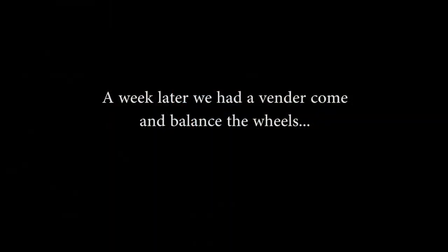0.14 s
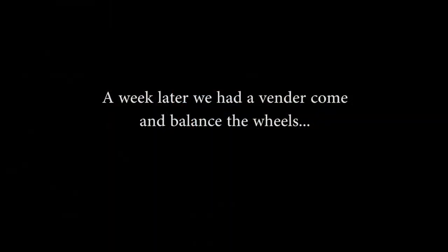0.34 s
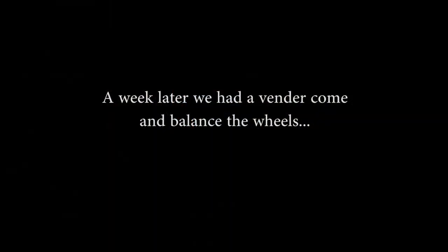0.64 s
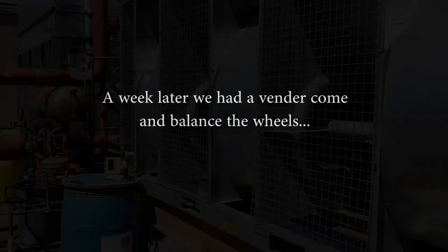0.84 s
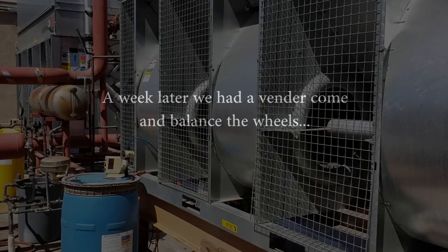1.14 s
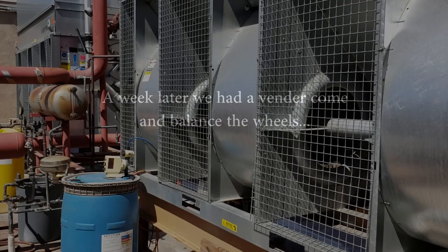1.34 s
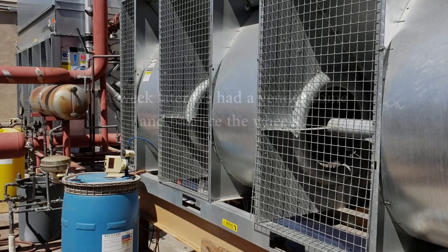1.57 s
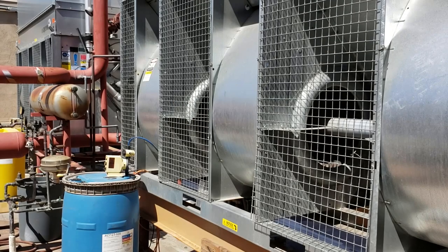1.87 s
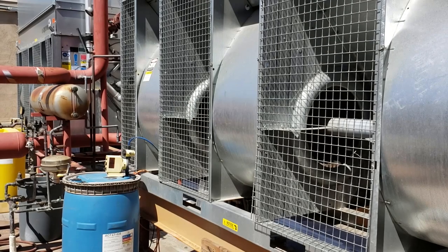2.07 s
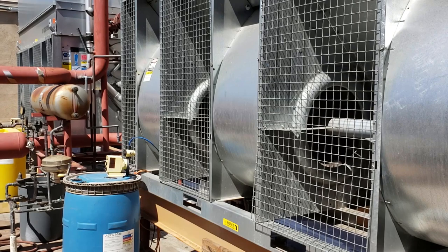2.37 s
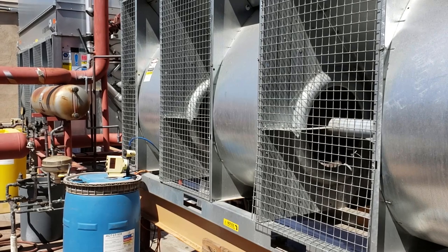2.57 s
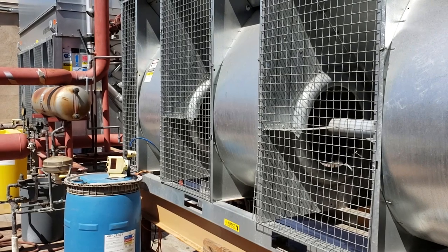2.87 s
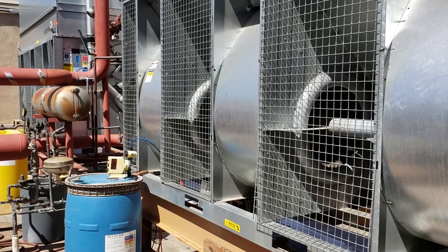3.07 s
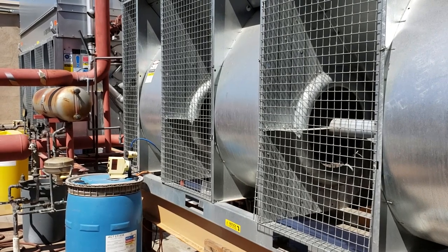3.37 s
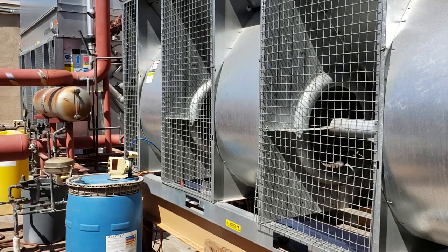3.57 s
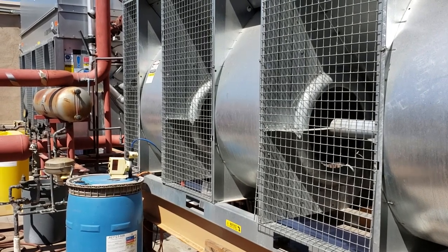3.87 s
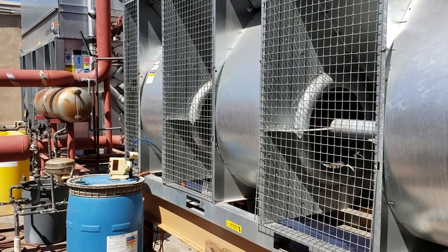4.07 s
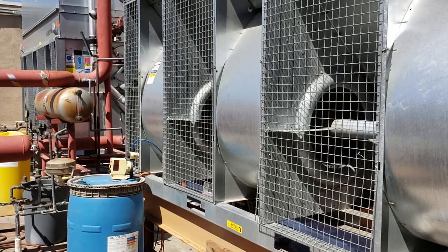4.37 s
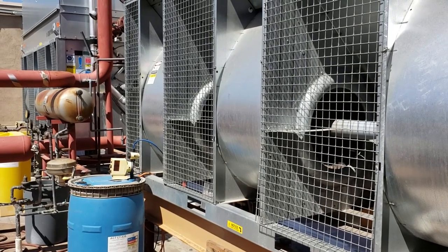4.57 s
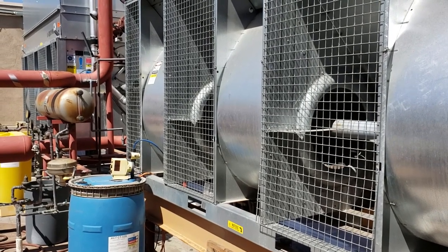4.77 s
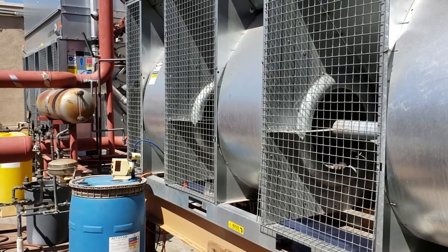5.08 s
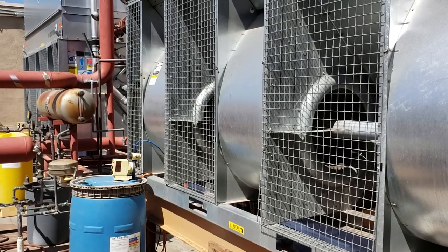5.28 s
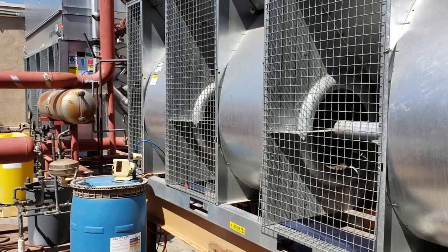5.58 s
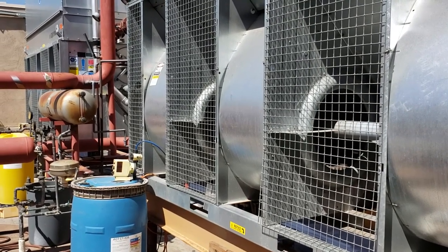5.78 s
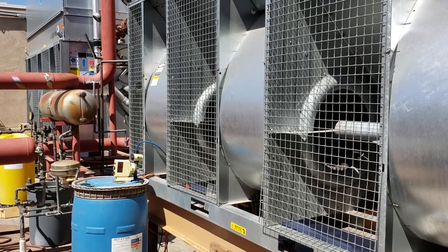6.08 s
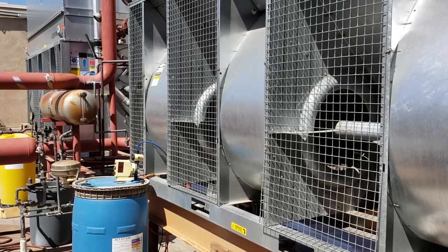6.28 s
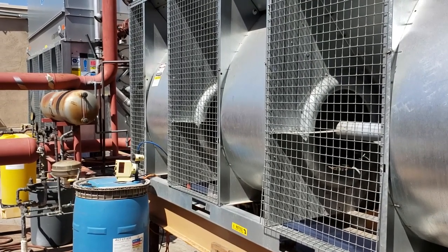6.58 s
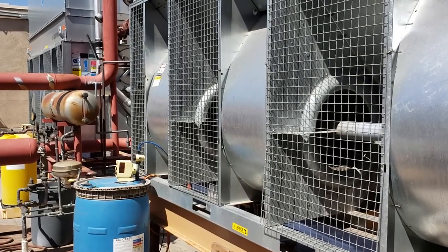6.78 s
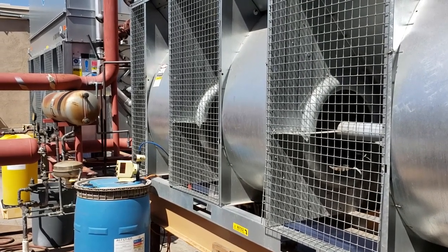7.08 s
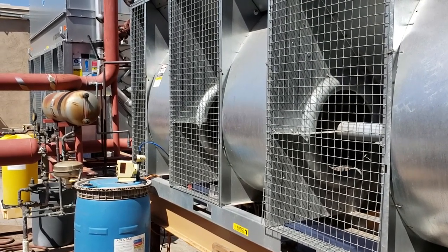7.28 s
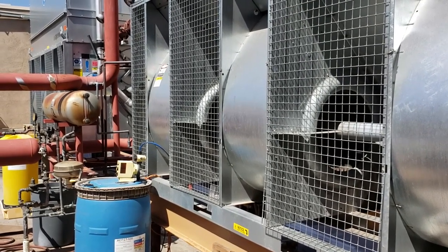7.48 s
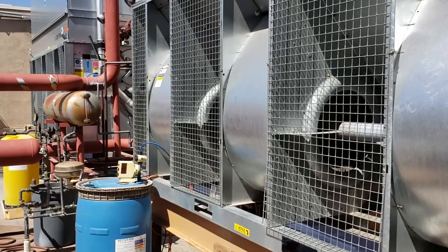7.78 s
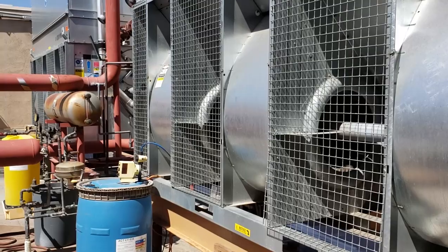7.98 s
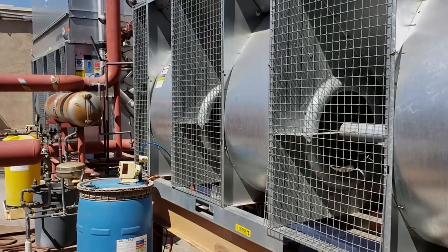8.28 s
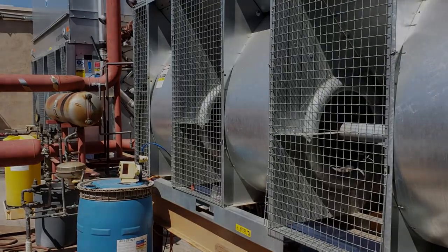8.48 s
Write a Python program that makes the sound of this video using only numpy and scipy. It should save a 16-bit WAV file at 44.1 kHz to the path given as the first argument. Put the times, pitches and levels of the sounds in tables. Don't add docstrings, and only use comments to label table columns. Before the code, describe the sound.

After a short silence, big industrial fans swell up and run steadily, rumbling and rushing with piercing electric whine, then begin to fade.

```python
import sys
import numpy as np
from scipy import signal
from scipy.fft import rfft, irfft, next_fast_len
from scipy.io import wavfile
from scipy.ndimage import uniform_filter1d

SR = 44100
rng = np.random.default_rng(int(sys.argv[2]) if len(sys.argv) > 2 else 0)


def file_out(sig):
    cols = np.atleast_2d(sig).T
    lim = np.clip(cols, -1, 1)
    pcm = np.round(lim * 32767).astype(np.int16)
    wavfile.write(sys.argv[1], SR, pcm)


def volts(x):
    e = np.asarray(x, float) / 20
    return 10 ** e


N = 380583

# pitch_hz, left_db [dB per Hz], right_db [dB per Hz], likeness [0-1], left_lag_rad
ROAR_SPECTRUM = [(22, -69, -70, .8, .1), (32, -61, -61.5, .85, 0), (42, -44.5, -45.7, .93, .1),
                 (58, -42.5, -43, .88, .1), (80, -43.4, -44.4, .82, .1), (130, -46.2, -47.6, .84, .1),
                 (200, -50.8, -51.1, .91, .1), (280, -57.8, -57.1, .8, .1), (420, -57.5, -60, .47, .2),
                 (520, -60, -64.5, .57, .4), (700, -61.5, -62.6, .58, .6), (950, -61.8, -64.2, .29, 1.6),
                 (1300, -61.6, -64.6, .27, 2.2), (1700, -63, -64, .08, 2.4)]
# pitch_hz, left_db [dB per Hz], right_db [dB per Hz], likeness [0-1]
RUSH_SPECTRUM = [(1700, -63.4, -65, .08), (2040, -64.5, -65, 0), (2810, -72, -69, 0),
                 (3730, -70.5, -73.5, 0), (4040, -71, -68.5, 0.1), (4780, -74, -78, 0.1),
                 (5730, -72, -82, 0), (6800, -75, -77.5, 0.07), (7600, -72.5, -74.5, 0),
                 (8500, -80, -79, 0.13), (9970, -77, -75.3, 0.13), (11700, -68.5, -66, .04),
                 (12500, -74.5, -68, 0), (13800, -69.5, -67.5, 0.03), (15500, -71, -70.5, .07)]
# start_s [s, at the peak], level_db [dB]
HOUSING_SURGES = [(1.33, -24), (1.46, -22), (1.72, -23), (1.98, -23.5), (2.11, -25), (2.32, -31),
                  (2.54, -23), (2.94, -20), (3.1, -22), (3.25, -25), (3.48, -26), (3.82, -23), (4.08, -21),
                  (4.84, -21.5), (5.04, -23), (5.72, -22.5), (5.89, -24), (6.03, -19), (6.14, -24),
                  (6.3, -25), (6.53, -27), (6.75, -24), (6.9, -24), (7.41, -23), (7.57, -21.5),
                  (7.74, -22.5), (7.91, -24), (8.56, -23)]
# start_s [s, at the peak], level_db [dB], length_s [s]
PORT_GUSTS = [(.95, -30, .12), (1.4, -33, 0.22), (1.82, -33, .06), (2.26, -36, .07), (2.87, -40, 0.046),
              (5.845, -34, .04), (6.03, -23, .035), (6.23, -31, 0.16), (6.53, -31, .05), (6.74, -28, 0.056),
              (6.9, -23.5, 0.031), (7.05, -37, .06), (7.422, -34, 0.074), (7.6, -28, 0.057),
              (7.803, -28, .09), (8.575, -28, 0.028)]
# start_s [s], level_db [dB]
RUSH_LEVEL = [
    (1.6, .3),
    (5.9, .2),
    (6.6, -.6),
    (7.3, -.5),
    (7.7, -.1),
    (8.63, -.4),
]
# pitch_hz [Hz], left_db [dB], right_db [dB], left_lag_rad [rad], waver_hz [Hz]
WHEEL_TONES = [(58, -36, -36.5, 0, 3.0), (194, -44, -45, 0, 1.5), (352, -50, -50, .1, 1.1),
               (403.8, -42.5, -54, -.4, .25), (405, -50, -53, .3, .1), (1205.5, -46, -58, 1.9, 1.8),
               (1304.1, -61, -50, .5, 1.1), (1334, -56, -57, .5, 1.5), (2165.4, -57, -56, 1.3, 2.5),
               (3431.9, -58, -67, 1.8, .8), (4803.5, -62, -70, 0, .8), (5204.3, -58, -65, -2.7, .8),
               (5832.8, -59, -72, -.4, .8), (5920.3, -59, -65, -.6, .8)]
# start_s [s], pitch_hz [Hz]
SLOT_PITCH = [
    (0, 1221.8),
    (8.63, 1223.2),
]
CARRIER_LINES = [(1, 0, k) for k in (-7, -5, -3, -2, -1, 0, 1, 2, 3, 5, 7)]
HARMONIC_LINES = [(2, 0, k) for k in (-6, -2, 0, 2, 4)] + [(3, 0, k) for k in (-5, -3, 3, 5)]
SLOT_LINES = [(1, 1, k) for k in (-5, -3, -1, 1, 3)] + [(2, -1, 0), (2, -1, 6), (1, -1, 3), (0, 1, 0)]
# left_db [dB], right_db [dB], left_lag_rad [rad]
WHINE_LEVELS = [(-64, -63, -2.1), (-56, -57, 0.6), (-58, -61, 2.2), (-57, -53, -2.0), (-46, -36, -1.3),
                (-56, -66, -1.1), (-40, -43, -0.4), (-68, -59, -3.0), (-48, -49, -0.3), (-52, -54, -2.4),
                (-57, -56, 2.8), (-65, -61, -0.9), (-60, -58, -0.9), (-59, -62, -3.0), (-67, -68, -1.3),
                (-67, -68, -0.2), (-58, -48, -1.4), (-54, -51, -0.3), (-57, -55, -0.1), (-52, -51, 2.1),
                (-61, -70, -1.8), (-51, -50, 1.5), (-59, -71, 0.6), (-57, -71, 1.5), (-51, -70, 0.3),
                (-63, -63, 0.4), (-63, -63, -0.7), (-64, -56, 1.1), (-44, -45, 0.7)]
STRONG_LINES = {4: [0, 1], 6: [2, 3], 28: [4, 4], 21: [5, 6]}
# level_db [dB], echo [share 0-1], loudest_s [s], period_s [s]
STANDING_WAVES = [
    (1.5, 0.5, 9.3, 12),
    (0.76, 0.13, 4.2, 5.5),
    (-0.2, 0.36, 5.75, 2.4),
    (-2, 1, 2.3, 8.9),
    (-0.1, 0.21, 3.2, 10.2),
    (-3.5, .9, 5.1, 3.9),
    (-1.5, 0.56, 5.15, 4.3),
]


def in_time(rows):
    s, *columns = np.transpose(rows)
    return np.array([np.interp(np.arange(N) / SR, s, column) for column in columns])


def drift(rate_hz, count=1, shape=np.asarray):
    pole = np.exp(-200 * np.pi * rate_hz / SR)
    noise = rng.standard_normal((count, N // 100 + 2002))
    slow = signal.lfilter([1], [1, -2 * pole, pole * pole], noise)[:, 2000:]
    slow = shape((slow - slow.mean(1, keepdims=True)) / slow.std(1, keepdims=True))
    return np.array([np.interp(np.arange(N) / 100, np.arange(len(s)), s) for s in slow])


def sway(db, rate_hz, count=1):
    return drift(rate_hz, count, shape=lambda slow: volts(db * slow))


def bursts(quiet_db, rows):
    s = np.arange(0, N + 100, 100) / SR
    power = volts(2 * quiet_db)
    for peak_s, level_db, length_s in rows:
        power = power + volts(2 * level_db) * np.exp(-((s - peak_s) / length_s) ** 2)
    return np.interp(np.arange(N) / SR, s, 10 * np.log10(power))


def follow(x, level_db, grip):
    loudness = np.sqrt(uniform_filter1d(x ** 2, size=4000) + 1e-12)
    moving_gain = (volts(level_db) / loudness) ** grip
    steady_gain = (volts(level_db.mean()) / loudness.mean()) ** (1 - grip)
    return x * moving_gain * steady_gain


def turbulence(patchy_db):
    size = next_fast_len(N)
    hz = np.arange(size // 2 + 1) * SR / size + 1e-3
    last_lag = ROAR_SPECTRUM[-1][4]
    rows = np.array(list(ROAR_SPECTRUM) + [(*row, last_lag) for row in RUSH_SPECTRUM[1:]])
    left_db, right_db, alike, lag = (np.interp(np.log(hz), np.log(rows[:, 0]), c) for c in rows.T[1:])
    alike = np.clip(alike, 0, 1)

    common, *own = rfft(rng.standard_normal((3, size)))
    shared = np.sqrt(alike) * common * np.exp(np.array([-1j * lag, 0 * lag]))
    mixed = shared + np.sqrt(1 - alike) * np.array(own)
    mixed *= volts(np.array([left_db, right_db])) * np.sqrt(SR / 2) * (hz > 15)

    centres = 37.5 * 2. ** np.arange(10)
    place = np.clip(np.log2(hz / centres[0]), 0, 9)
    rumble, rush = 0, 0
    breath = sway(0.2 * patchy_db, 4.2)
    for k, centre in enumerate(centres):
        share = np.cos(np.pi / 2 * np.clip(place - k, -1, 1)) ** 2
        band = irfft(mixed * share, size)[:, :N] * breath * sway(patchy_db, 10.5)
        if centre < 300:
            rumble = rumble + band
        else:
            rush = rush + band
    return rumble, rush


def housing_rumble(rumble):
    lull_db, surge_s = -26, 0.041
    flow_db = bursts(lull_db, [(s, db, surge_s) for s, db in HOUSING_SURGES])
    return follow(rumble.mean(0), flow_db, grip=0.7) * volts(np.array([[.1], [-.1]]))


def guard_rush(rush):
    return rush * volts(in_time(RUSH_LEVEL))


def wheels(sway_db):
    out = 0
    for hz, left_db, right_db, lag, waver_hz in WHEEL_TONES:
        pitch_hz = hz + waver_hz * drift(1.21)[0]
        out = out + sway(sway_db, 2.3) * tone(pitch_hz, left_db, right_db, lag)
    return out


def tone(hz, left_db, right_db, lag):
    turns = (2 * np.pi * (np.cumsum(hz) / SR % 1)).astype(np.float32)
    peak = np.sqrt(2) * volts(np.array([[left_db], [right_db]]))
    return peak * np.sin([turns - np.float32(lag), turns])


def motor(sway_db, eccentric, flutter_db):
    carrier_hz, supply_hz, shaft_hz = 3999.5, 56.08, 9.2
    slot_hz = in_time(SLOT_PITCH)[0]
    slide = standing_waves()
    lines = CARRIER_LINES + HARMONIC_LINES + SLOT_LINES
    out = 0
    for k, ((carrier, slot, supply), line) in enumerate(zip(lines, WHINE_LEVELS)):
        gain = slide[STRONG_LINES[k]] if k in STRONG_LINES else sway(sway_db, 0.48, count=2)
        pitch_hz = carrier * carrier_hz + slot * slot_hz + supply * supply_hz
        out = out + gain * tone(pitch_hz, *line)
    throb = 1 + eccentric * np.sin(2 * np.pi * shaft_hz * np.arange(N) / SR)
    return out * throb * sway(flutter_db, 9.3, count=2)


def standing_waves():
    level_db, echo, loudest_s, period_s = np.transpose(STANDING_WAVES)[:, :, None]
    echo = np.clip(echo, 0, 1)
    turn = np.cos(2 * np.pi * (np.arange(N) / SR - loudest_s) / period_s)
    return volts(level_db) * np.sqrt(1 + echo ** 2 + 2 * echo * turn)


def port_wind(rumble):
    calm_db = -42
    gusts = follow(rumble[0] - rumble[1], bursts(calm_db, PORT_GUSTS), grip=1.0)
    return gusts * np.array([[1.5], [-.5]])


def scene():
    rumble, rush = turbulence(patchy_db=0.39)
    air = housing_rumble(rumble) + guard_rush(rush) + port_wind(rumble)
    tones = wheels(sway_db=2.5) + motor(sway_db=2.0, eccentric=.08, flutter_db=.6)
    return air + tones


def top_cut(x):
    return signal.sosfilt(signal.butter(12, 15760, fs=SR, output="sos"), x)


def record(dry):
    open_s, rise_s, close_s, fall_s, first_s = 0.81, 0.98, 8.31, 0.74, .8185
    s = np.arange(N) / SR
    rise = np.sin(np.pi / 2 * np.clip((s - open_s) / rise_s, 0, 1))
    fall = np.cos(np.pi / 2 * np.clip((s - close_s) / fall_s, 0, 1))
    return top_cut(dry * rise * fall * (s > first_s))


dry = scene()
out = record(dry)
file_out(out)
```